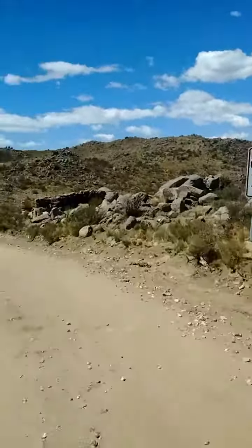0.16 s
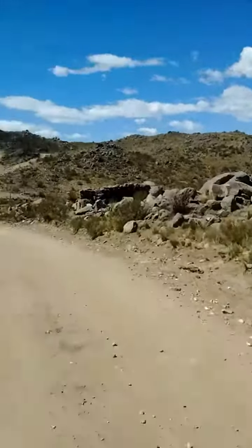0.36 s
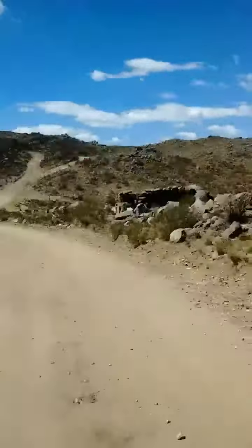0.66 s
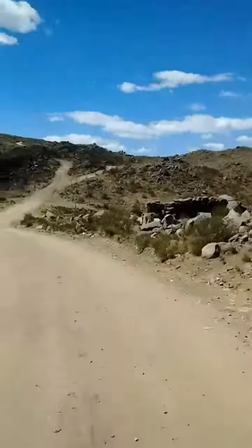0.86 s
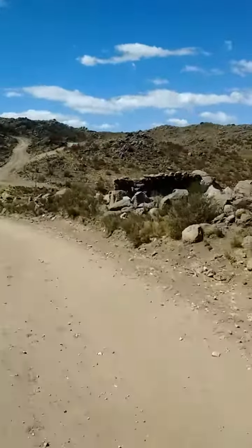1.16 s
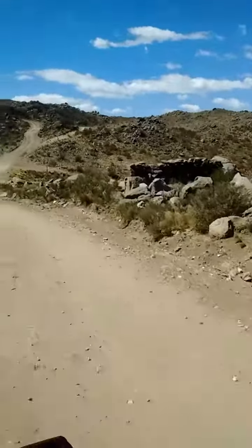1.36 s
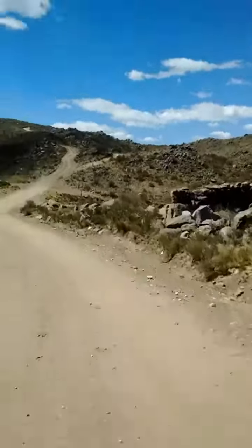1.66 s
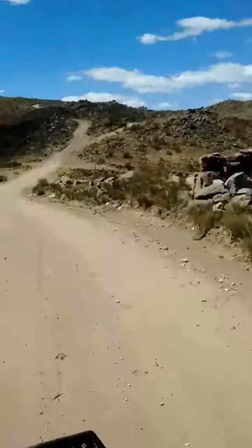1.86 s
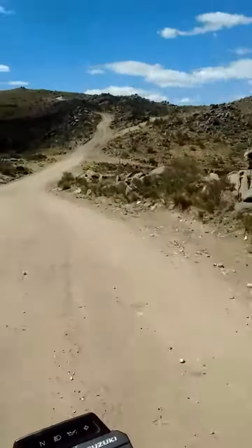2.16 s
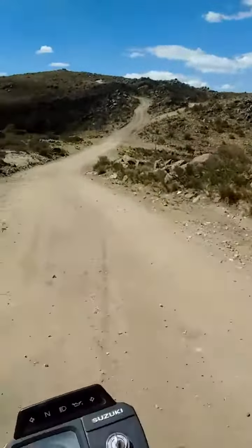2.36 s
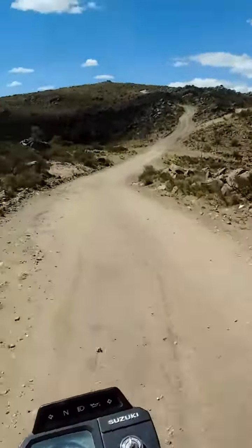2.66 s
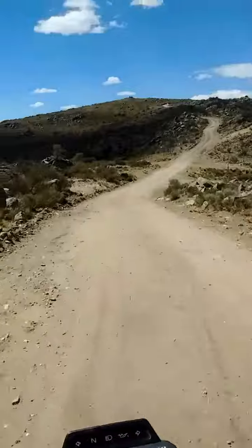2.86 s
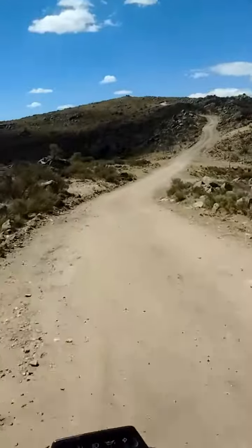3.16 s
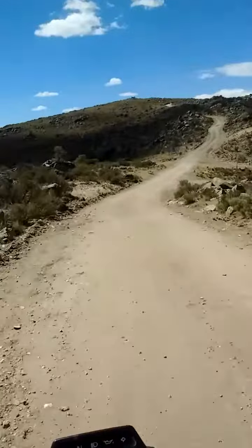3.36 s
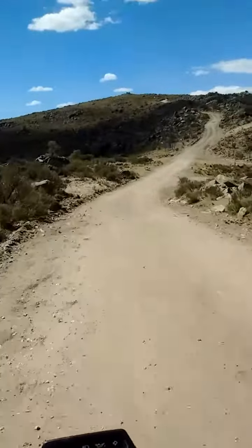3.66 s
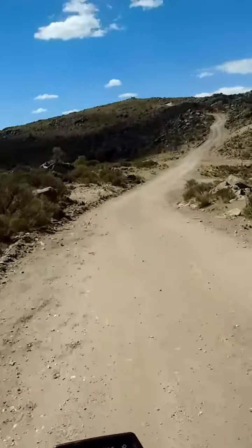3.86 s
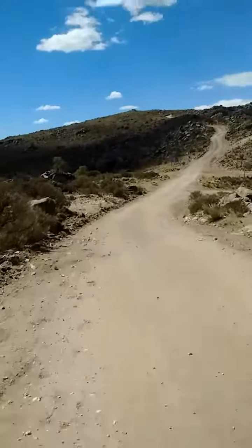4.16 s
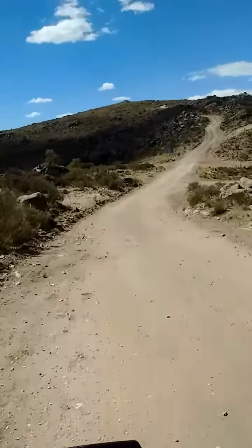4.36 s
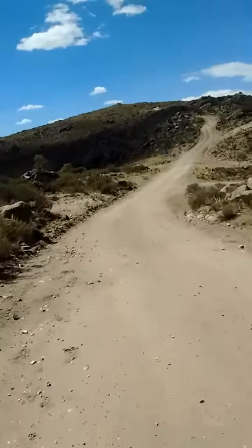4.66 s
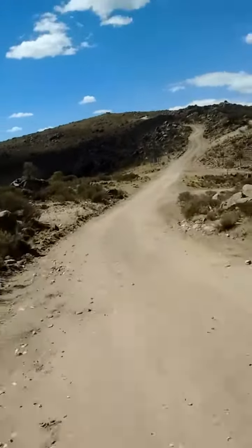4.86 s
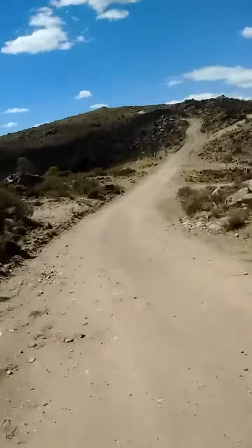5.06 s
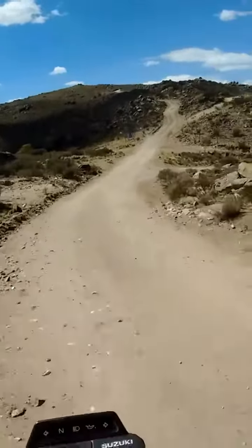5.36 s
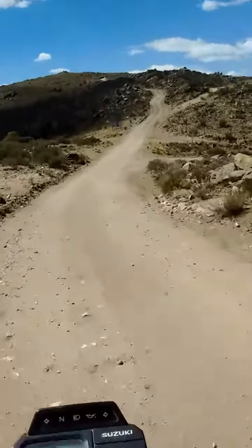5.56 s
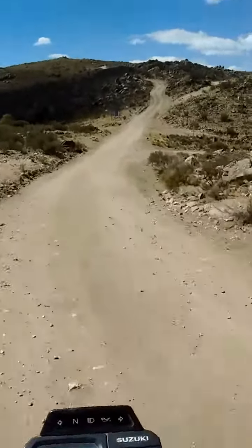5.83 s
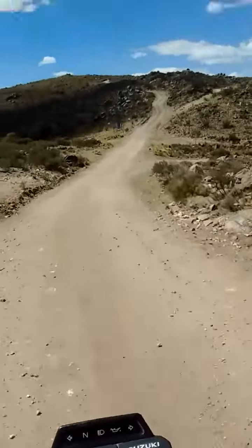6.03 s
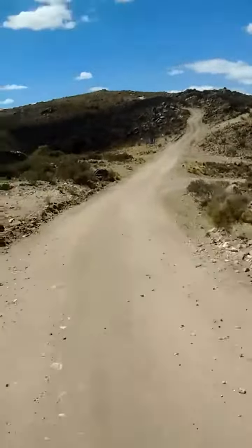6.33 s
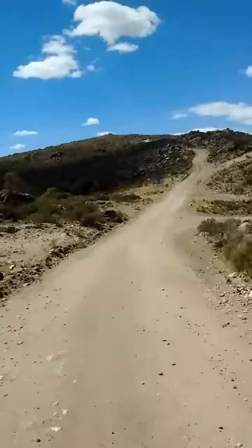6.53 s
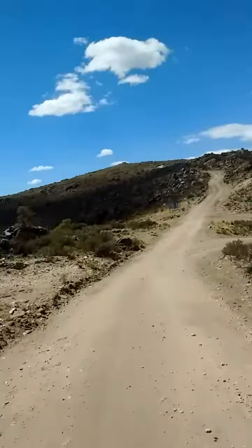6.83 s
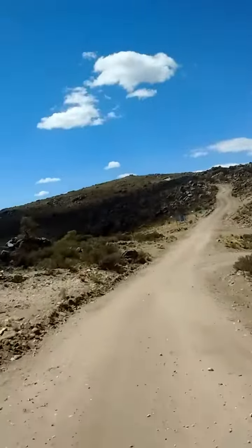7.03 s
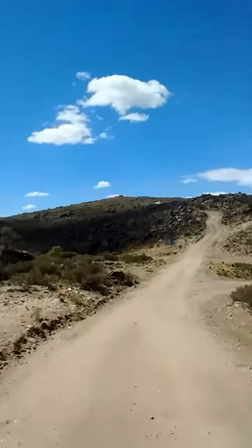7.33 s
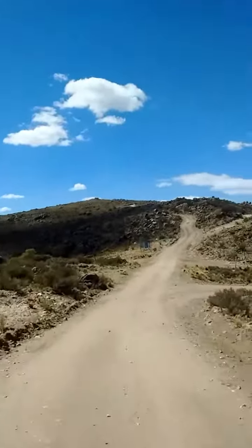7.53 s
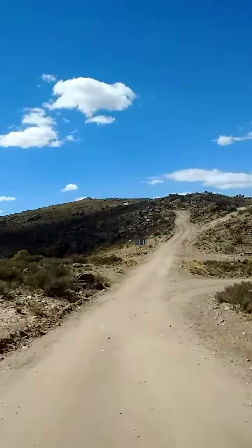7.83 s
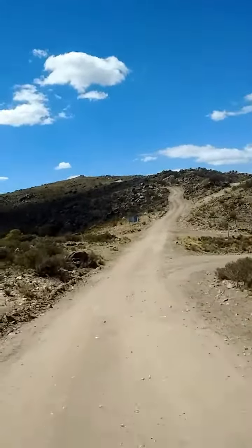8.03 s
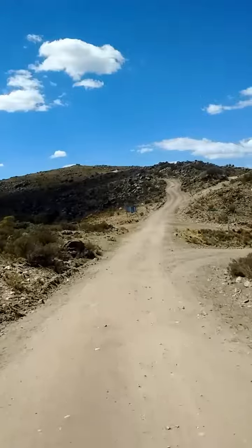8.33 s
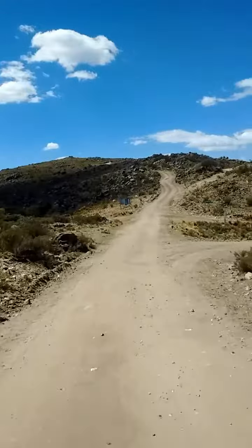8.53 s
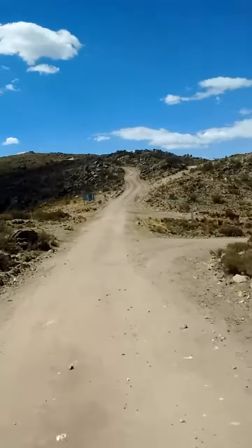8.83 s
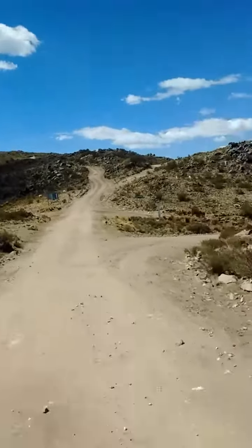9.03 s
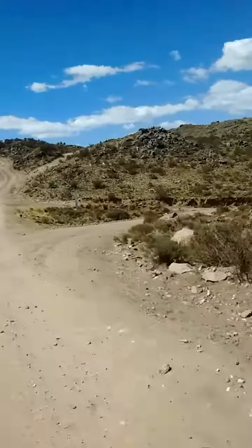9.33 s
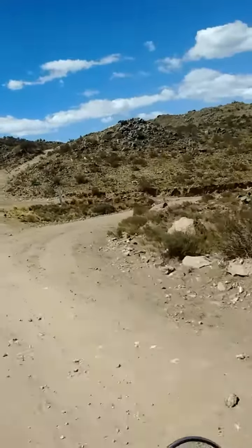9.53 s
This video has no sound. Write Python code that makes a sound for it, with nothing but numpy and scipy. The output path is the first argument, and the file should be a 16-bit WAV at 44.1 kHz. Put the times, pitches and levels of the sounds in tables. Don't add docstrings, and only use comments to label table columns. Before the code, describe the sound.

Uneven pinging exhaust pops from a small motorbike at part throttle, buzzing metal clatter, gritty tyre hiss, stone ticks and low wind gusts.

```python
import sys
import numpy as np
from scipy import signal
from scipy.fft import rfft, irfft, next_fast_len
from scipy.io import wavfile
from scipy.ndimage import uniform_filter1d, map_coordinates

SR = 44100
rng = np.random.default_rng(int(sys.argv[2]) if len(sys.argv) > 2 else 0)


def pcm_store(signal):
    levels = np.round(np.clip(np.atleast_2d(signal), -1, 1) * 32767)
    wavfile.write(sys.argv[1], SR, levels.astype(np.int16).T)


def gain_from_decibels(decibels):
    exponent = np.asarray(decibels, float) / 20
    return 10 ** exponent


N = 427329

# f/Hz, lead of the left/rad, likeness/0-1, left minus right/dB
AIR_PORTS = [(0, 3.14, .95, 0), (400, 3.1, .92, 2), (600, 2.9, .9, 11), (800, 2, .5, 7), (1050, .7, .85, 3),
             (1600, 0, .93, -1.5), (2200, -.6, .92, -1), (2600, -1.9, .6, -1), (2930, -np.pi, .995, 0),
             (3450, -np.pi, .993, 0), (3750, -3.8, .8, 0), (4250, -5, .5, -1), (4700, -2 * np.pi, .97, -.5),
             (4850, -2 * np.pi, .97, -.5), (5400, -7.2, .6, -2), (6400, -9.4, .85, -2),
             (7600, -11.4, .7, -6), (8600, -13, .55, -4), (10200, -15.7, .3, -1), (12500, -19, .5, 1),
             (13800, -7 * np.pi, .6, 0), (14400, -7 * np.pi, .7, 0), (14900, -8 * np.pi, .7, 0)]
BURN_AT = 0.36


def unit(x):
    return x / np.sqrt(np.mean(x ** 2) + 1e-20)


def curves(rows):
    s, *cols = np.transpose(rows)
    return [np.interp(np.arange(N) / SR, s, c) for c in cols]


def wobble(rate):
    knots = rng.standard_normal(int(N * rate / SR) + 4)
    return map_coordinates(knots, [np.arange(N) * rate / SR])


def swells(times, lengths):
    since = np.arange(0, N, 64) / SR - np.array(times)[:, None]
    return np.exp(-(since / np.array(lengths)[:, None]) ** 2)


def spread(coarse):
    return np.interp(np.arange(N), np.arange(0, N, 64), coarse)


def filtered(x, response):
    m = next_fast_len(x.shape[-1] + 4096)
    spectrum = rfft(x, m) * response(np.fft.rfftfreq(m, 1 / SR))
    return irfft(spectrum, m)[..., :x.shape[-1]]


def colour(spectrum, humps=()):
    f, db = np.transpose(spectrum)

    def gain(hz):
        lift = sum(top_db / (1 + (2 * (hz - c) / w) ** 2) for c, w, top_db in humps)
        return gain_from_decibels(np.interp(np.log(hz + 1), np.log(f), db, -120, -120) + lift)
    return gain


def rush(response, patchy_db):
    z = signal.stft(rng.standard_normal((2, N)), nperseg=512)[2]
    field = uniform_filter1d(rng.standard_normal(z.shape[1:]), size=5, axis=0)
    field = uniform_filter1d(field, size=10, axis=1)
    pair = signal.istft(z * gain_from_decibels(patchy_db * unit(field)), nperseg=512)[1][:, :N]
    return unit(filtered(pair, response))


def ring(modes, t, spread_db, attack):
    hz, db, t60 = np.transpose(modes)[:, None, :, None]
    luck = rng.standard_normal((3, 2, len(modes), 1))
    tones = np.sin(2 * np.pi * hz * (1 + 0.018 * luck[0]) * t + 0.65 * luck[1])
    decaying = gain_from_decibels(db + spread_db * luck[2] - 60 * t / t60) * tones
    return decaying.sum(1) * (1 - np.exp(-t / attack))


def at_ports(pair, ports):
    f, lead, alike, tilt_db = np.transpose(ports)
    side = np.array([[1], [-1]])

    def turn(hz):
        return np.arccos(np.clip(np.interp(hz, f, alike), 0, 1)) / 2

    def port(hz):
        balance = gain_from_decibels(side * np.interp(hz, f, tilt_db) / 2)
        return balance * np.exp(0.5j * (side - 1) * np.interp(hz, f, lead))

    common = filtered(pair[0], lambda hz: port(hz) * np.cos(turn(hz)))
    apart = filtered(pair[1], lambda hz: side * port(hz) * np.sin(turn(hz)))
    return common + apart


def crank():
    # t/s, peak level/dB, low
    # ring level/dB
    firings = [(0.1675, -3, -21), (0.5067, -4.5, -23), (1.1822, -6.5, -20), (1.3179, -9, -24),
               (1.4765, -4.5, -25), (1.7065, -6, -21), (1.8951, -6, -26), (1.9884, -7, -24), (2.2438, -8, -21),
               (2.4488, -4.5, -22), (2.5845, -8, -38), (2.6763, -5.5, -27), (2.7691, -8, -18),
               (3.0954, -7, -23), (3.4615, -6, -18), (3.5972, -6, -42), (4.1465, -7.5, -15),
               (4.3071, -4.5, -36), (4.4887, -7.5, -16), (4.6259, -6.5, -18), (4.8768, -5.5, -24),
               (5.244, -6.5, -26), (5.4291, -4, -17), (5.5927, -7.5, -14), (5.874, -3.5, -24),
               (6.0107, -4, -26), (6.2617, -8.5, -23), (7.3133, -9, -17), (8.4487, -8, -21), (8.5804, -7, -28),
               (0.324, -9, -27), (0.62, -14, -13), (0.7525, -11, -22), (0.842, -11.5, -17), (0.9561, -10, -29),
            (1.5669, -10, -26), (2.1032, -13.5, -14), (2.54, -12, -25), (2.8623, -13.5, -15),
            (2.9575, -9, -35), (3.187, -10.5, -27), (3.2788, -8, -22), (3.3703, -9.5, -18),
            (3.711, -12.5, -29), (3.803, -8, -24), (4.1009, -12, -18), (4.261, -9.5, -28),
            (4.784, -10.5, -20), (5.1968, -12.5, -18), (5.686, -15, -28), (5.781, -11, -24),
            (6.124, -10, -35), (6.4886, -9, -22), (6.759, -12.5, -19), (6.892, -11.5, -23),
            (7.402, -11, -14), (7.6844, -14, -14), (8.0112, -13, -27), (8.1439, -11, -32),
            (8.69, -12.5, -18),
               (0.0503, -15, -22), (0.2562, -21, -20), (0.4148, -17, -21), (0.4601, -31, -12),
             (0.6644, -21, -15), (0.7085, -18.5, -11), (0.7974, -27, -28), (1.0014, -16, -16),
             (1.27, -23, -25), (1.4313, -17, -15), (1.6139, -21, -16), (2.357, -16, -28),
             (2.4039, -19, -33), (3.0024, -28, -32), (3.049, -37, -30), (3.2338, -20, -27),
             (3.5527, -18.5, -25), (3.7569, -17, -23), (4.191, -21, -32), (4.3982, -16, -29),
             (4.443, -20, -36), (4.5805, -17, -32), (4.739, -18, -35), (5.016, -23, -29),
             (5.0609, -16, -26), (5.3354, -20, -31), (5.383, -19, -16), (5.7342, -18, -18),
             (5.8277, -15.5, -22), (5.9676, -28, -33), (6.1705, -15, -27), (6.2156, -11.5, -28),
             (6.352, -24, -25), (6.5786, -23, -29), (6.6229, -15.5, -26), (6.668, -15, -21),
             (6.7126, -14.5, -28), (6.8016, -14, -19), (6.9363, -18.5, -14), (6.982, -17, -14),
             (7.0266, -19, -19), (7.0729, -24, -15), (7.225, -17, -22), (7.2705, -19, -17),
             (7.3587, -16.5, -16), (7.8808, -30, 0), (8.098, -25, -25), (8.2311, -18, -23),
             (8.297, -24, -38), (8.537, -22, -21), (8.8228, -22.5, -28),
               (6.4432, -13.5, -19), (7.1158, -15, -18), (7.5108, -16.5, -12), (8.734, -16, -26),
               (9.06, -20, -17), (9.1474, -10.5, -15), (9.2587, -18, -6.5), (9.3471, -16.5, -4.5),
               (9.415, -28, 5), (9.4813, -15.5, -8.5), (9.524, -18, -6), (9.5676, -16.5, -5),
               (9.612, -25, -11), (9.6793, -30, 3)]
    # t/s, rate/turns per s
    speed = [
        (0, 44),
        (6.6, 44.2),
        (7.5, 45.9),
        (9.7, 45.5),
    ]
    loud = np.array(sorted(firings))
    fired = loud[:, 0]
    s, rate = np.transpose(speed)
    gaps = np.round(np.diff(fired) * np.interp(fired[1:], s, rate))
    number = np.cumsum(np.r_[np.ceil(fired[0] * rate[0]), gaps])
    times = np.r_[fired[0] - 1, fired, fired[-1] + 1]
    counts = np.r_[number[0] - rate[0], number, number[-1] + rate[-1]]
    return loud, number, np.interp(np.arange(N) / SR, times, counts) + BURN_AT


def half_burns(loud, number, turns):
    # t/s, level/dB
    mixture = [(0, -31), (.7, -37), (1.2, -45), (1.7, -29), (2.4, -62), (3.0, -25), (3.7, -51), (3.95, -52),
               (4.3, -61), (5.0, -50), (5.75, -45), (6.3, -54), (7.0, -41), (7.4, -26), (7.65, -50),
               (8.6, -30), (8.9, -59), (9.7, -47)]
    emptied, full_db = 1.9, -13
    refill_turns, misfire_db = 2.8, -20
    low_db, scatter_db = -11, 1.6
    passing = np.flatnonzero(np.diff(np.floor(turns - BURN_AT)) > 0)
    apart = np.round(turns[passing] - BURN_AT)[:, None] - number
    nearest = np.abs(apart).min(1)
    to_go = np.where(apart < 0, -apart, 2 * len(passing)).min(1)
    refilling = np.exp(-np.abs(apart) / refill_turns) * (apart > 0)
    refill_db = (emptied * np.clip(loud[:, 1] - full_db, 0, None) * refilling).max(1)
    luck = rng.standard_normal((len(passing), 3))
    misfire = (to_go % 2 == 1) | (nearest == 1)
    db = curves(mixture)[0][passing] - refill_db + misfire_db * misfire + scatter_db * luck[:, 1]
    rows = np.c_[passing / SR + 0.0006 * luck[:, 0], db, low_db + 4 * luck[:, 2]]
    return rows[(nearest > 0) & (passing > SR // 200)]


def exhaust(burns):
    # f/Hz, level/dB, t60/s
    chamber = [(2060, 18.5, 0.0049), (1600, 5.5, 0.01), (1765, -11.5, 0.035), (1881, 4, 0.031),
               (1980, 3, 0.05), (2260, -4, 0.034), (2400, -4.5, 0.05), (2640, -5, 0.0082),
               (3730, -18, 0.15), (3960, -19, 0.014), (4550, -38, .015), (5070, -20.5, 0.057),
               (6200, -37, .015)]
    low_ring = [(1234, -6, 0.091), (1400, 9, 0.049), (1520, 4.5, 0.034)]
    muffler = [(350, -7, .04), (497, -2, .15), (590, 4.5, .026), (680, -2, .03)]
    pipe = [(150, 0, .07), (215, -10, .06)]
    # f/Hz, density/dB per Hz
    crack_colour = [(300, -41), (1000, -9), (2500, 2), (3000, -6), (4000, 6), (6000, -4), (9000, -16),
                    (12000, -50)]
    port_open_s = 0.0235
    muffled_hz = 8000
    t = np.arange(4096) / SR
    out = np.zeros((2, N + 2 * len(t)))
    for s, db, low_db in burns:
        burst = gain_from_decibels(-60 * t / 0.0095) * rng.standard_normal((2, len(t)))
        crack = filtered(burst, colour(crack_colour)) * (1 - np.exp(-t / 0.00033))
        ping = ring(chamber, t, 1.5, 0.0014) + gain_from_decibels(0.5) * crack
        ping = ping / np.abs(ping).max(1, keepdims=True)
        ping = ping + gain_from_decibels(low_db - 3.5) * ring(low_ring, t, 0.88, 0.0013)
        thud = gain_from_decibels(-12.5 + 0.31 * db + 0.3 * low_db) * ring(muffler, t, 1.8, 0.001)
        thud = thud / (1 + (t / port_open_s) ** 16)
        push = gain_from_decibels(-6.5 + 0.5 * db) * ring(pipe, t, 1.8, 0.0015)
        out[:, round((s - 0.0002) * SR):][:, :len(t)] -= push
        out[:, round((s + 0.0006) * SR):][:, :len(t)] -= thud
        out[:, round((s + 0.0007) * SR):][:, :len(t)] += gain_from_decibels(db - 1.0) * ping
    return filtered(out[:, :N], lambda hz: 1 / (1 + (hz / muffled_hz) ** 8))


def beat(turns, at, depth_db, sharp):
    size = 1 + 0.33 * rng.standard_normal(int(turns[-1]) + 3)
    pulse = np.exp(sharp * (np.cos(2 * np.pi * (turns - at)) - 1))
    return gain_from_decibels(depth_db * size[(turns - at + 1.5).astype(int)] * pulse)


def casing(turns, shake_db):
    # f/Hz, density/dB per Hz
    body = [(400, -27), (620, -19.5), (800, -4), (1000, -3), (1500, -0.5), (2400, 2), (2800, -4),
            (3300, -67), (4500, -53)]
    # f/Hz, width/Hz, level/dB
    resonances = [(704, 35, 21), (1240, 30, 8.5), (1400, 140, 3), (1807, 90, 3), (1994, 38, 8.5),
                  (2340, 86, 0)]
    rattle = unit(beat(turns, 0.091, 1, 1.0) * rush(colour(body, resonances), patchy_db=1.5))
    return gain_from_decibels(-32.5 + 0.93 * shake_db) * rattle


def fins(turns, clatter, shake_db):
    # f/Hz, density/dB per Hz
    fizz = [(2000, -56), (2800, -5), (3300, -3.5), (4000, -7), (4500, -14), (5200, -12), (6500, -9),
            (7200, -12), (9000, -17), (10500, -35)]
    # f/Hz, width/Hz, level/dB
    resonances = [(3520, 900, 3), (4030, 28, 7), (5550, 200, 3), (6470, 280, 3.5)]
    buzz = unit(clatter * beat(turns, 0.18, 3.8, 1.2) * rush(colour(fizz, resonances), patchy_db=2.0))
    return gain_from_decibels(-35 + shake_db) * buzz


def shaft(turns):
    # multiple of the crank rate, rms level/dB
    orders = [(2, -35), (4, -35), (5, -29.5), (6, -39), (7, -29.5), (8, -43), (8.5, -42), (9, -36),
              (9.5, -42), (10, -40), (10.5, -42), (11, -42), (11.5, -43), (16, -48)]
    tones = 0
    for k, db in orders:
        tone = np.sin(2 * np.pi * (k * turns + rng.random()))
        tones = tones + gain_from_decibels(db + 1.5 + 1.8 * wobble(3.3)) * tone
    return tones * [[1], [0]]


def gravel(clatter, shake_db):
    # t/s, lift/dB, length/s
    loose = [
        (0.1, 7, .15),
        (1.05, 3, .15),
        (1.92, 8, .2),
        (2.9, 8, .06),
        (3.3, 3, .15),
        (5.7, 8.5, .35),
        (9.3, 2, .15),
        (8.1, -3, .9),
    ]
    # f/Hz, density/dB per Hz
    grit = [(3000, -40), (7000, -1.5), (10000, -3), (12200, -4), (14000, -8), (15150, -11), (15320, -28),
            (16000, -50)]
    s, lift_db, length = np.transpose(loose)
    level_db = -56 + 0.16 * shake_db + spread(lift_db @ swells(s, length))
    skitter = gain_from_decibels(1.2 * wobble(30) + 1.2 * wobble(150))
    return gain_from_decibels(level_db) * unit(skitter * clatter * rush(colour(grit), patchy_db=3.0))


def engine():
    # t/s, level/dB
    shaking = [(0.0, -40), (0.29, -40.5), (2.26, -39), (3.8, -41.5), (4.15, -37.5), (4.85, -41),
               (5.53, -38), (5.74, -36.5), (6.06, -40.5), (7.44, -40), (7.55, -41.5), (8.17, -44),
               (8.38, -41.5), (9.68, -40)]
    loud, number, exact = crank()
    turns = uniform_filter1d(exact, size=9000, mode="nearest")
    shake_db = curves(shaking)[0]
    shake_db = shake_db - shake_db.mean()
    clatter = beat(turns, 0.82, 3.7, 2.5)
    pops = exhaust(np.r_[loud, half_burns(loud, number, exact)])
    rattles = casing(turns, shake_db) + fins(turns, clatter, shake_db)
    return pops + rattles + shaft(turns) + gravel(clatter, shake_db)


def ticks(levels, modes, share, left_db):
    passing = np.flatnonzero(np.diff(np.floor(crank()[2] - share)) > 0)
    level_db = curves(levels)[0]
    t = np.arange(1024) / SR
    out = np.zeros((2, N + 2 * len(t)))
    for at, luck in zip(passing, rng.standard_normal((len(passing), 2))):
        start = max(0, at + round(0.0005 * luck[0] * SR))
        tick = gain_from_decibels(level_db[at] + 2.8 * luck[1]) * ring(modes, t, 1.9, 0.001)
        out[:, start:][:, :len(t)] += tick
    return gain_from_decibels([[left_db], [-left_db]]) * at_ports(out[:, :N], AIR_PORTS)


def reed():
    # t/s, level/dB
    strength = [(0, -39), (.9, -38), (1.1, -31), (1.5, -41), (2.2, -37), (2.9, -36), (3.7, -39), (4.2, -46),
                (5, -49), (5.6, -34), (6.2, -44), (7.2, -48), (8, -40), (9.7, -75)]
    # f/Hz, level/dB, t60/s
    modes = [(5170, -4, 0.016), (5310, 3.5, 0.019), (5640, 2, 0.01)]
    return ticks(strength, modes, share=0.07, left_db=4)


def skirt():
    # t/s, level/dB
    strength = [(0, -42), (1, -47), (2, -43), (3, -46), (4, -47), (5, -47), (6, -46), (7, -46), (7.7, -59),
                (8.3, -43), (8.8, -44), (9.3, -45), (9.7, -62.5)]
    # f/Hz, level/dB, t60/s
    modes = [(8530, -2, 0.0071), (8560, 11, 0.013), (9100, -6, .008), (6300, -3, .01)]
    return ticks(strength, modes, share=0.72, left_db=2.5)


def stones_and_clatters():
    # t/s, peak level/dB
    hits = [(0.061, -31), (0.0843, -17), (0.536, -15), (0.5826, -17), (1.5075, -22), (2.1819, -21),
            (2.9139, -10.5), (5.0469, -19), (5.566, -12), (5.615, -15), (5.6825, -23), (6.451, -17),
            (6.475, -17), (8.655, -19), (8.675, -18), (9.661, -40)]
    blows = np.zeros((2, N))
    blows[:, [round(s * SR) for s, _ in hits]] = gain_from_decibels([db - 5.5 for _, db in hits])
    decay = np.exp(-1 / (0.0014 * SR))
    bursts = signal.lfilter([1], [1, -decay], blows) * rng.standard_normal((2, N))
    return filtered(bursts, colour([(2500, -30), (5000, 1), (8000, 4.5), (12000, -16), (15500, -18)]))


def wind():
    # t/s, peak level/dB, length/s, flutter over buffet/dB
    gust_rows = [(0, -17, 0.041, -12), (0.275, -19.5, 0.17, -3), (0.693, -19.5, 0.076, 1),
                 (0.787, -19, 0.12, -12), (1.095, -17, 0.18, -4.5), (1.518, -18.5, 0.2, -5),
                 (1.764, -22, 0.064, -9), (1.876, -17, 0.079, -2.5), (1.967, -18, 0.013, 0),
                 (2.24, -16, 0.19, -6), (2.848, -18.5, 0.086, -9.5), (2.95, -11, 0.017, -7),
                 (3.305, -16, 0.046, -7), (3.386, -18, 0.031, 0), (3.478, -17, 0.031, -3),
                 (3.554, -17.5, .04, -1.5), (3.742, -21, 0.091, -17), (4.172, -18.5, 0.14, -4.5),
                 (4.484, -23, 0.019, -5), (4.626, -12, 0.037, -10), (4.705, -14, 0.012, -11),
                 (4.82, -14, 0.015, -7), (4.963, -18.5, 0.087, -12), (5.3, -24, 0.35, -9),
                 (5.921, -18.5, 0.17, -6), (6.255, -17, 0.07, -4.5), (6.579, -18, 0.13, -4),
                 (6.796, -12, 0.025, -5.5), (6.957, -18, 0.16, -7), (7.277, -16, 0.053, -3.5),
                 (7.357, -31, 0.073, 5), (7.635, -14, 0.17, -3.5), (7.924, -15, 0.06, -8),
                 (7.997, -18.5, 0.03, -0.5), (8.136, -18, 0.046, -7), (8.462, -18.5, 0.2, -3.5),
                 (8.89, -16.5, 0.53, -4.5), (9.42, -18, 0.033, -8), (9.68, -18.5, 0.15, -6.5)]
    # f/Hz, density/dB per Hz
    buffet_colour = [(15, -9), (30, -13), (60, -4.5), (120, 0), (200, 0.5), (280, -12.5), (400, -41),
                     (600, -60)]
    flutter_colour = [(120, -52), (220, 3), (300, 0), (480, -6), (560, -17), (640, -20), (900, -18),
                      (1400, -42), (2500, -54)]
    # f/Hz, width/Hz, level/dB
    frame = [(160, 17, 1), (345, 70, -4), (440, 50, 0), (500, 28, 1)]
    # f/Hz, lead of the left/rad, likeness/0-1, left minus right/dB
    gust_ports = [(0, 3.13, 0.94, -1.5), (203, 3.136, 0.93, -1), (338, 3.04, 0.8, 1.5),
                  (500, 2.95, 0.74, 2), (835, 1.6, 0.98, 6.5), (1510, 0.44, 0.34, 13)]
    calm_db, calm_flutter_db = -24, -26
    s, db, length, flutter_db = np.transpose(gust_rows)
    gusts = swells(s, length)
    buffet_gain = np.sqrt(spread(gain_from_decibels(2 * calm_db) + gain_from_decibels(2 * db) @ gusts))
    flutter_gain = np.sqrt(spread(gain_from_decibels(2 * calm_flutter_db) + gain_from_decibels(2 * (db + flutter_db)) @ gusts))
    lumps = 0.6 * wobble(12) + 0.8 * wobble(35)
    buffet = unit(gain_from_decibels(lumps) * rush(colour(buffet_colour, frame), patchy_db=0.7))
    quick_lumps = 1.06 * lumps + 1.14 * wobble(70)
    flutter = unit(gain_from_decibels(quick_lumps) * rush(colour(flutter_colour, frame), patchy_db=0.1))
    return at_ports(buffet_gain * buffet + flutter_gain * flutter, gust_ports)


def scene():
    air = at_ports(engine() + stones_and_clatters(), AIR_PORTS)
    return air + reed() + skirt() + wind()


def band_limit(x):
    return signal.sosfilt(signal.butter(12, 15670, fs=SR, output="sos"), x)


def record(dry):
    rounded = dry / (1 + np.abs(dry) ** 8) ** (1 / 8)
    mix = filtered(rounded, lambda hz: hz < 15670)
    return band_limit(mix)


dry = scene()
out = record(dry)
pcm_store(out)
```